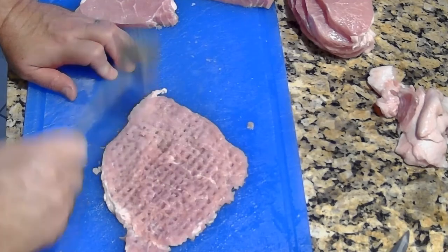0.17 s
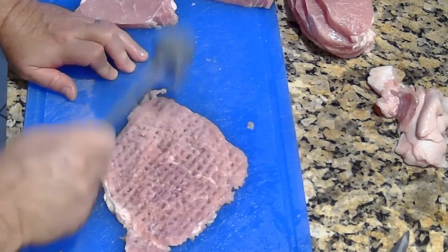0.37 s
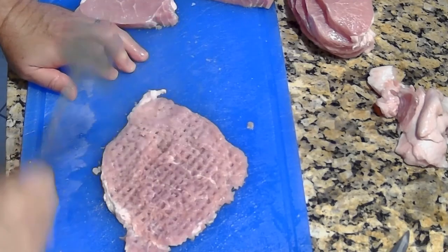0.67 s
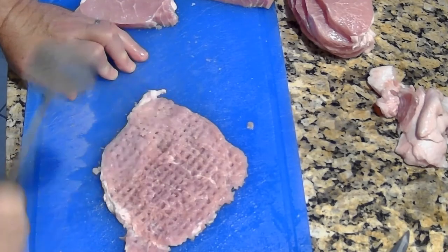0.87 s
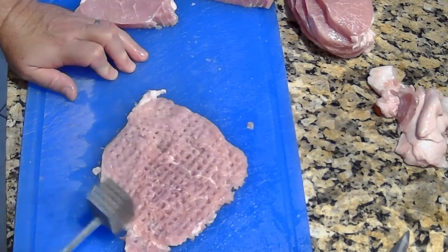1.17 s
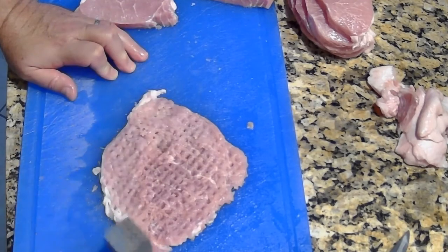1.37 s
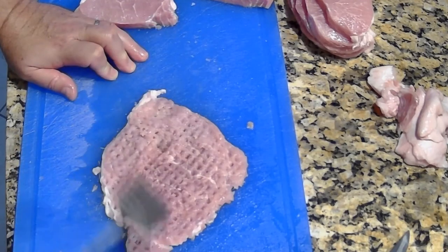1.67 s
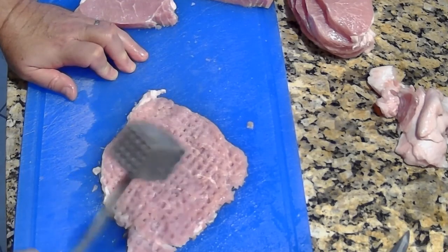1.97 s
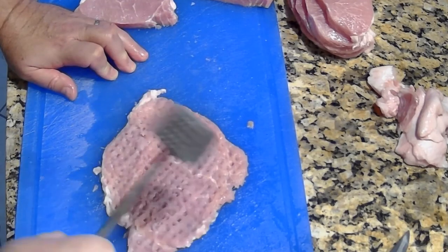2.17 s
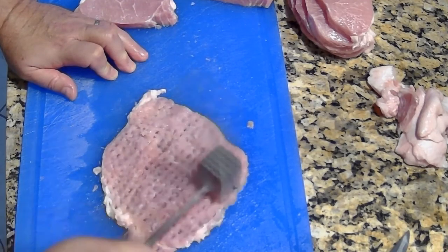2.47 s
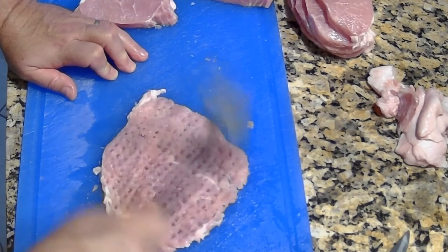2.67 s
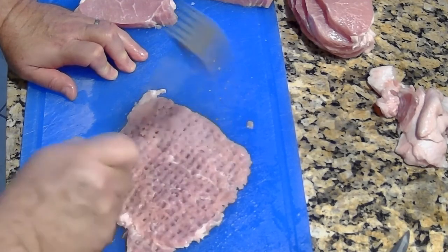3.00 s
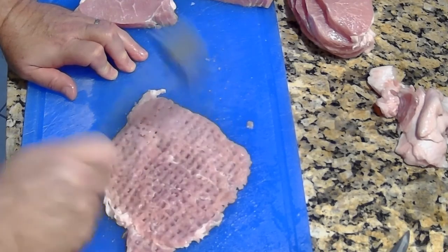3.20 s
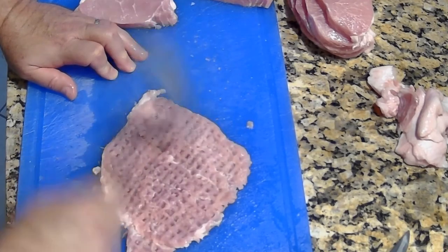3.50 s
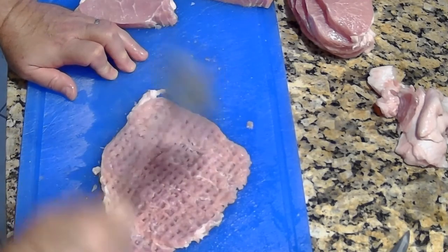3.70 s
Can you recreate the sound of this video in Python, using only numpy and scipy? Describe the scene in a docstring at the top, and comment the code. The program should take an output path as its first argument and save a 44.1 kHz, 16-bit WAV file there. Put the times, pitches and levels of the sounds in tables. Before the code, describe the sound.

A metal meat mallet pounds a pork chop on a plastic board over a stone counter, four to five blows a second, close microphone distorting on peaks, short hard kitchen echo.

```python
"""First the tail of a blow already struck, over low rumble and hiss; then four to five more blows a second.
A metal mallet pounds a pork chop on a plastic board on a stone counter, and a hard-walled kitchen answers.
Noise bursts make the crack and the wet splat; decaying sines make the meat, board, counter and trapped air.
Delays, decaying sines and decaying bands of noise make the kitchen; one swing puffs air on the microphone.
The microphone is close and its loudest peaks clip hard."""
import sys
import numpy as np
from scipy import signal
from scipy.fft import rfft, irfft, next_fast_len
from scipy.io import wavfile
from scipy.ndimage import uniform_filter1d

SR = 44100
rng = np.random.default_rng(int(sys.argv[2]) if len(sys.argv) > 2 else 0)


def generate_wav(signal):
    """Clip the signal to [-1, 1] and save it as 16-bit WAV at the path in sys.argv[1]."""
    frames = np.transpose(np.atleast_2d(signal))
    scaled = np.clip(frames, -1, 1) * 32767
    pcm = np.round(scaled).astype(np.int16)
    wavfile.write(sys.argv[1], SR, pcm)


N = 169785
LEAD, SIZE = 4410, 32768  # samples before time zero; samples in one kitchen response


def from_db(db):
    """Decibels to gain."""
    return 10 ** (np.asarray(db) / 20)


def at_hz(points, hz, axis=1):
    """Read a column of a table on a log-frequency axis."""
    points = np.array(points)
    return np.interp(np.log(np.maximum(hz, 1)), np.log(points[:, 0]), points[:, axis])


def noise(spectrum, size):
    """Noise of a given colour, rms 1."""
    hz = np.arange(size // 2 + 1) * SR / size
    white = rfft(rng.standard_normal(size))
    x = irfft(white * from_db(at_hz(spectrum, hz)), size)
    return x / x.std()


def dying(t, t60):
    """Starts at time zero and falls 60 dB in t60 seconds."""
    return (t >= 0) * np.exp(-np.log(1000) * np.abs(t) / t60)


def ring(t, hz, t60):
    """One struck mode: a sine that dies away."""
    return np.sin(2 * np.pi * hz * t) * dying(t, t60)


def smooth(x, seconds):
    """One-pole average."""
    r = np.exp(-1 / (seconds * SR))
    return signal.lfilter([1 - r], [1, -r], x + 1e-18)


# Colour of the rumble and hiss. Each row: frequency in Hz, relative level in dB per Hz.
FLOOR_COLOUR = [(12, 2.5), (25, -1), (45, -19), (65, -5), (100, -20), (160, -20), (400, -37), (1000, -63),
                (3000, -68), (8000, -64), (16000, -60)]
FLOOR_DB = -38.5  # rms


def background():
    """Steady noise, heaviest in the lowest bass."""
    return from_db(FLOOR_DB) * noise(FLOOR_COLOUR, next_fast_len(N))[:N]


# Air on the microphone. Each row: centre in seconds, level in dB before the low cut, width in seconds.
AIR_PUFFS = [(3.221, -15, .012)]
PUFF_CUT_HZ = 5


def draught():
    """The swing's air reaches the microphone as one slow swell and its rebound."""
    t = np.arange(N) / SR
    swell = sum(-from_db(db) * np.exp(-((t - s) / width) ** 2) for s, db, width in AIR_PUFFS)
    low_cut = signal.butter(2, PUFF_CUT_HZ, "high", fs=SR, output="sos")
    return signal.sosfilt(low_cut, swell)


# Early reflections from cabinets and ceiling. Each row: delay in seconds, gain before the band filter.
EARLY_ECHOES = [(.0072, 0.16), (.0095, 0.11), (.0163, 0.12), (.0175, 0.17), (.0188, 0.08), (.0215, 0.09),
                (.036, 0.059)]
ECHO_LOW_HZ, ECHO_HIGH_HZ = 540, 10700
ECHO_SHIFT_S = .0003  # typical shift of an echo path as the mallet moves over the meat


def echoes(x):
    """Thin early reflections whose paths shift a little from blow to blow."""
    t = (np.arange(len(x)) - LEAD) / SR
    blow_times = np.array(MALLET_BLOWS)[:, 0]
    shifts = ECHO_SHIFT_S * rng.standard_normal((len(blow_times), len(EARLY_ECHOES)))
    out = 0
    for (delay_s, gain), shift in zip(EARLY_ECHOES, shifts.T):
        arrival = t - delay_s - np.interp(t, blow_times, shift)
        out = out + gain * np.interp(arrival, t, x)
    band = signal.butter(1, [ECHO_LOW_HZ, ECHO_HIGH_HZ], "band", fs=SR, output="sos")
    return signal.sosfilt(band, out + 1e-18)


# The kitchen's reverberation. Each row: frequency in Hz, relative level in dB, 60 dB decay time in seconds.
ROOM_DECAY = [(81.4, -0.5, 0.13), (201, 2.5, .45), (347, 1.5, 0.26), (480, -6, .38), (1000, -2, 0.38),
              (1564, -2.5, 0.41), (2315, -1.5, 0.38), (4500, -7.5, .41), (8100, -8, 0.37),
              (15200, -7, 0.087)]
ROOM_DB, ROOM_BUILD_S, ROOM_DELAY_S = -7.5, 0.0069, .007


def reverberation(x):
    """The diffuse field: overlapping half-octave bands store the energy of the blows and let it die away."""
    hz = np.fft.rfftfreq(len(x), 1 / SR)
    source = rfft(x)
    whites = rfft(rng.standard_normal((2, len(x))))  # neighbouring bands take different noise
    out = 0
    for k, centre in enumerate(80 * 2 ** (np.arange(17) / 2)):
        band = np.cos(np.pi / 2 * np.clip(2 * np.log2(np.maximum(hz, 1) / centre), -1, 1))
        building = smooth(irfft(source * band, len(x)) ** 2, ROOM_BUILD_S)
        energy = smooth(building, at_hz(ROOM_DECAY, centre, axis=2) / np.log(10 ** 6))
        diffuse = irfft(whites[k % 2] * band, len(x))
        level = from_db(ROOM_DB + at_hz(ROOM_DECAY, centre))
        out = out + diffuse / diffuse.std() * np.sqrt(energy) * level
    return np.pad(out, (int(ROOM_DELAY_S * SR), 0))[:len(x)]


# Lingering resonances of the kitchen. Each row: frequency in Hz, level in dB, 60 dB decay time in seconds.
KITCHEN_MODES = [(200.6, -70.5, 0.17), (272, -55, .35), (384, -66.5, 0.51), (786, -69.5, 0.45),
                 (947, -60, 0.41)]


def kitchen(x):
    """Early reflections, some lingering resonances and the diffuse tail."""
    t = np.arange(SIZE) / SR
    response = sum(from_db(db) * ring(t, hz, t60) for hz, db, t60 in KITCHEN_MODES)
    resonances = signal.fftconvolve(x, response)[:len(x)]
    return echoes(x) + resonances + reverberation(x)


# Modes of the board. Each row: frequency in Hz, relative level in dB, 60 dB decay time in seconds.
BOARD_MODES = [(347, -17, 0.069), (509.9, -3, 0.065), (719.4, -2, 0.033), (849, -3.5, 0.034),
               (993, -6, 0.059), (1285, 1, 0.013), (1782, -2.5, 0.019), (2253, -2.5, 0.021),
               (3035, -16, 0.01)]
MODE_SCATTER_DB = 2.5  # the mallet lands on a different spot each time


def board_modes(t, colour):
    """The plastic board rings in short modes of alternating sign, coloured by the blow."""
    out = 0
    for k, (hz, db, t60) in enumerate(BOARD_MODES):
        level_db = db + at_hz(colour, hz) + MODE_SCATTER_DB * rng.standard_normal()
        out = out + ring(t, hz, t60) * from_db(level_db) * (-1) ** k
    return out


THUD_HZ, THUD_DB, THUD_T60_S = 363.5, -10.5, 0.054  # a pocket of air trapped under the meat pops
SLAP_DB, SLAP_T60_S = 4.5, 0.033  # air squeezed out between mallet and meat
BOOM_HZ, BOOM_DB, BOOM_T60_S = 194.9, -12.5, 0.098  # a blow that reaches the board shakes the worktop
BOOM_FOLLOWS = 1.32  # dB of boom per dB of hard clack below 0 dB
COUNTER_HZ, COUNTER_DB, COUNTER_T60_S = 82.2, -27.5, 0.17  # the counter under the board


def board_ring(t, thud_db, colour, clack_db, slap_hz):
    """Trapped air, meat, board and counter ring briefly under a blow."""
    thud = from_db(THUD_DB + thud_db) * ring(t, THUD_HZ, THUD_T60_S)
    slap = from_db(SLAP_DB + at_hz(colour, slap_hz)) * ring(t, slap_hz, SLAP_T60_S)
    boom = from_db(BOOM_DB + BOOM_FOLLOWS * min(clack_db, 0)) * ring(t, BOOM_HZ, BOOM_T60_S)
    counter = from_db(COUNTER_DB) * ring(t, COUNTER_HZ, COUNTER_T60_S)
    return board_modes(t, colour) + thud - slap - boom - counter


PUSH_S, PUSH_HEIGHT = 0.0015, 0.31


def air_push(t):
    """Pressure of the air ahead of the face climbs until contact."""
    return PUSH_HEIGHT * (t < 0) * np.exp(-np.abs(t) / PUSH_S)


def burst(t, t60):
    """A dense run of tiny contacts dying away, even in colour."""
    spectrum = rfft(rng.standard_normal(len(t)) * dying(t, t60))
    local = np.sqrt(uniform_filter1d(np.abs(spectrum) ** 2, size=41))
    return irfft(spectrum / local) * np.sqrt(np.sum(dying(t, t60) ** 2))


# The crack of the studded face. Each row: frequency in Hz, relative level in dB per Hz.
CRACK_COLOUR = [(150, -42.5), (500, 5.5), (1000, -1.5), (1800, -3.5), (2800, -6), (4000, -15),
                (6000, -27.5), (10000, -75), (16000, -33)]
CRACK_DB, CRACK_T60_S = 10, 0.019


def crack(t, colour):
    """The studs strike in a dense burst, coloured by the face and by the blow."""
    hz = np.fft.rfftfreq(len(t), 1 / SR)
    face = from_db(at_hz(CRACK_COLOUR, hz))
    face = face / np.sqrt(np.mean(face ** 2))
    shape = face * from_db(CRACK_DB + at_hz(colour, hz))
    filtered = irfft(rfft(burst(t, CRACK_T60_S)) * shape)
    return filtered * (t >= 0) * (t < t[-1] / 2)  # silence what the filter wraps round


# Juice bursting from under the studs. Each row: frequency in Hz, relative level in dB per Hz.
SPLAT_COLOUR = [(500, -7.5), (2000, 1), (3500, 5.5), (6500, -1), (10000, -8.5), (15000, -19)]
SPLAT_DB, SPLAT_T60_S, SPLAT_GRAIN_DB = -2, 0.015, 5
SQUISH_S, SQUISH_DB = 0.00066, 2  # the meat gives way before the board is reached


def splat(t, splat_db):
    """Wet noise in uneven 16-sample grains: a squish swelling up to contact, then a quick decay."""
    grain_levels = np.clip(rng.standard_normal(len(t) // 16), -1.5, 1.5)
    grains = from_db(SPLAT_GRAIN_DB * np.repeat(grain_levels, 16))
    squish = (t < 0) * from_db(SQUISH_DB) * np.exp(-np.abs(t) / SQUISH_S)
    envelope = dying(t, SPLAT_T60_S) + squish
    return from_db(SPLAT_DB + splat_db) * noise(SPLAT_COLOUR, len(t)) * grains * envelope


# The blows. Each row: contact in seconds, then relative levels in dB of the thud, board knock, meat slap,
# hard clack and wet splat, then slap pitch in Hz.
MALLET_BLOWS = [(-0.062, 5, -5.5, -6, -12.5, -21, 1004), (0.152, 4.5, -2.5, 0.2, -2, -15.5, 1730),
                (0.3643, -5, -2.3, -2, -1.5, -30, 1687), (0.5766, 2.5, -3.5, -4, -4, -17.5, 1236),
                (0.7946, 2.5, -6.9, 0, -5.5, -12, 1332), (1.0186, 1, -10, -4.5, -9.5, -4, 1412),
                (1.2347, 5.5, -12, -13.5, -7, 0.0, 1616), (1.4605, 1.5, -13.5, -4.5, -8, -4, 1293),
                (1.6854, -5.7, -19.0, -17.5, -22, -7.5, 1306), (1.902, -2, -13.5, -13, -11.5, -7, 1296),
                (2.123, -4, -9.3, -6.5, -9.4, -6, 1302), (2.3405, -39, -9.5, -6, -10, -8, 1332),
                (2.5573, -24, -13, -10.0, -12.5, -22.5, 1320), (2.778, -4.5, -6, 1, -3, -14, 1152),
                (2.9998, -25, -9.5, -3.5, -14, -12.5, 959), (3.2097, -22, -4.6, 2.3, 1, -14, 944),
                (3.4282, -2.5, -7, -2, -8.0, -21.5, 946), (3.6428, -15, -12.5, -14.5, -26, -6.5, 1477)]
# Where knock, slap and clack are centred: one frequency in Hz for each.
PART_CENTRES = [700, 1350, 2700]


def mallet():
    """All the blows, each at its time: the smacks and the ringing under them, as two signals."""
    out = np.zeros((2, N + 2 * LEAD + SIZE))
    before = LEAD // 10  # samples ahead of contact
    t = (np.arange(SIZE // 4) - before) / SR
    for s, thud_db, knock_db, slap_db, clack_db, splat_db, slap_hz in MALLET_BLOWS:
        colour = list(zip(PART_CENTRES, [knock_db, slap_db, clack_db]))
        smack = air_push(t) + crack(t, colour) + splat(t, splat_db)
        ringing = board_ring(t, thud_db, colour, clack_db, slap_hz)
        start = int(s * SR) + LEAD - before
        out[:, start:start + len(t)] += [smack, ringing]
    return out[:, :next_fast_len(N + LEAD, real=True)]


BOARD_ROOM_DB = -6.5  # the board lies flat and sends less into the room


def scene():
    """Blows in the kitchen, one puff of air, and a low rumble with hiss."""
    smacks, board = mallet()
    into_room = smacks + from_db(BOARD_ROOM_DB) * board
    heard = (smacks + board + kitchen(into_room))[LEAD:LEAD + N]
    return (heard + draught() + background())[None]


OVERLOAD, CUTOFF_HZ = .71, 16000  # clipping level at full scale 1; top of the band


def record(dry):
    """The microphone clips hard; the top is cut."""
    clipped = np.clip(dry, -OVERLOAD, OVERLOAD)
    return signal.sosfiltfilt(signal.butter(12, CUTOFF_HZ, fs=SR, output="sos"), clipped)


dry = scene()
out = record(dry)
generate_wav(out)
```